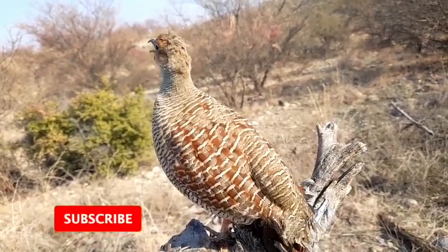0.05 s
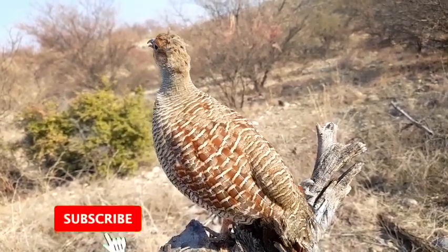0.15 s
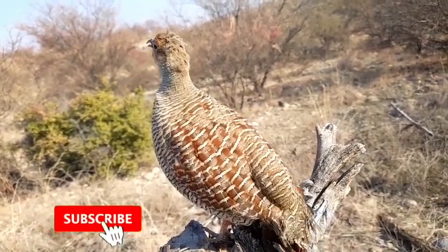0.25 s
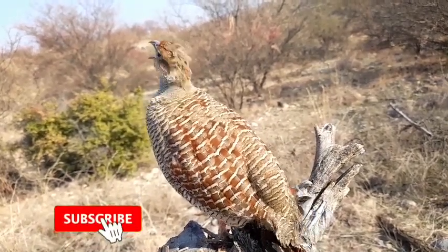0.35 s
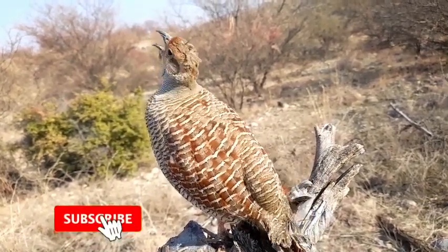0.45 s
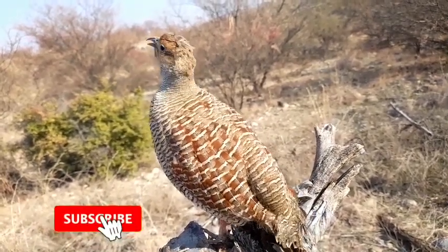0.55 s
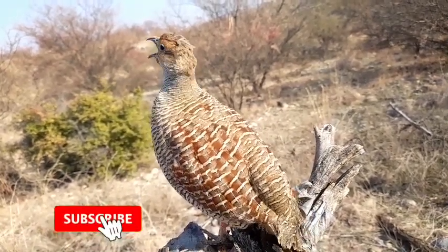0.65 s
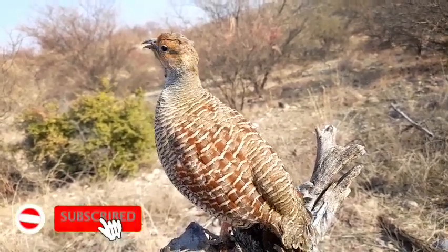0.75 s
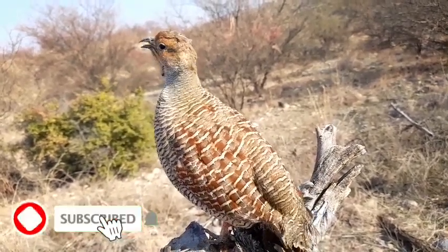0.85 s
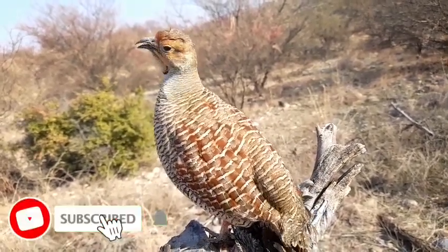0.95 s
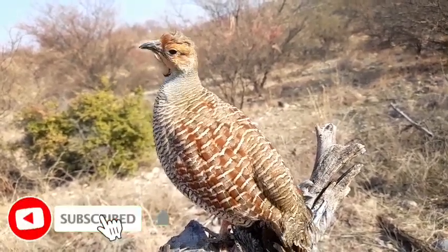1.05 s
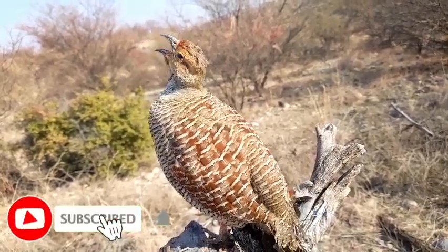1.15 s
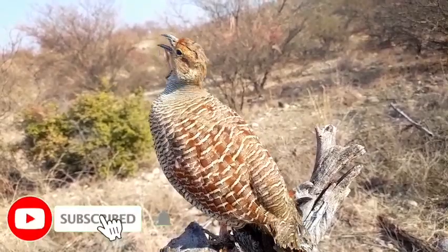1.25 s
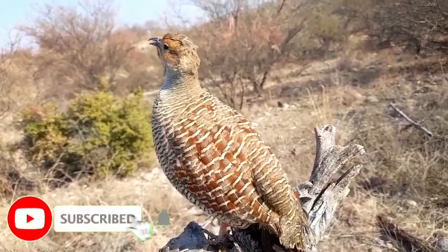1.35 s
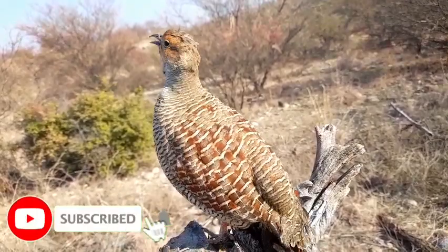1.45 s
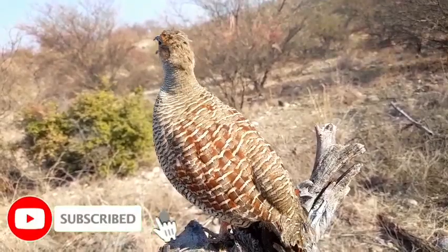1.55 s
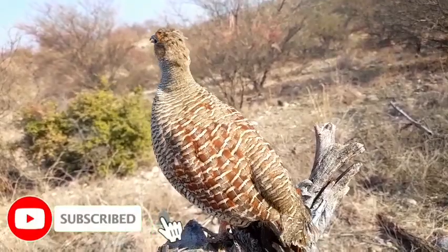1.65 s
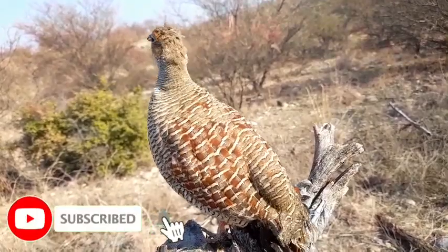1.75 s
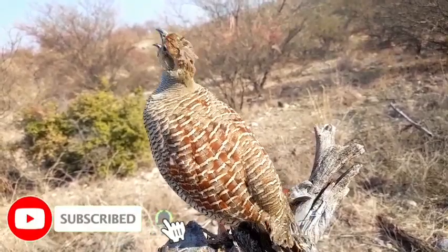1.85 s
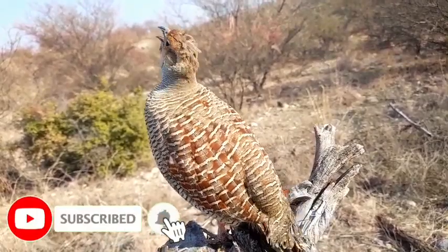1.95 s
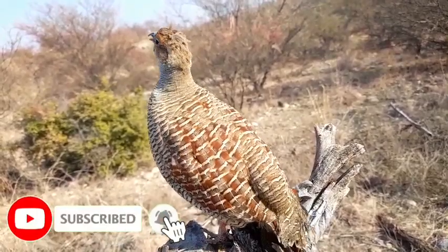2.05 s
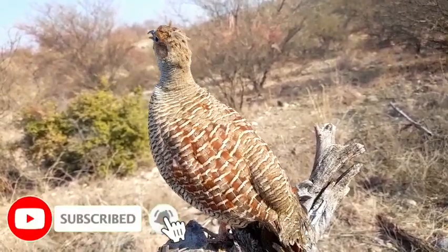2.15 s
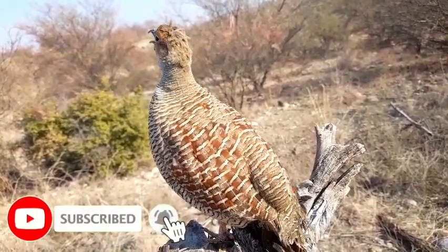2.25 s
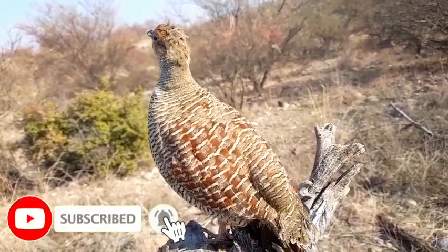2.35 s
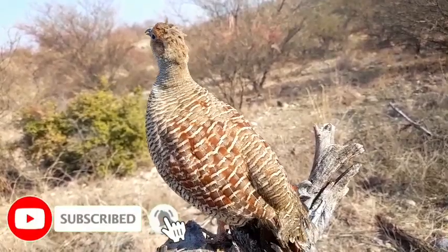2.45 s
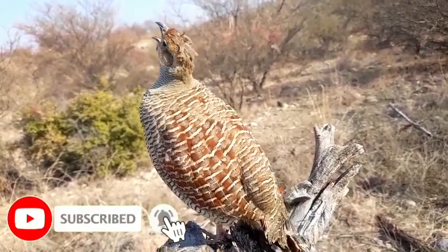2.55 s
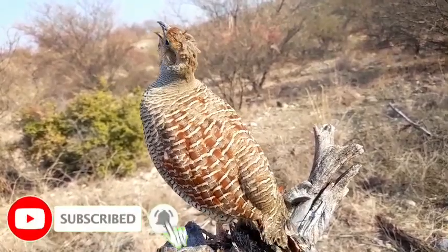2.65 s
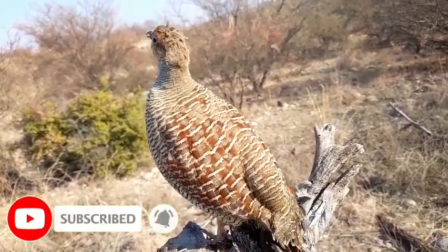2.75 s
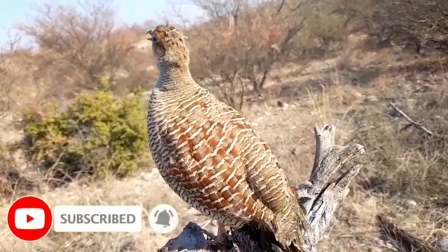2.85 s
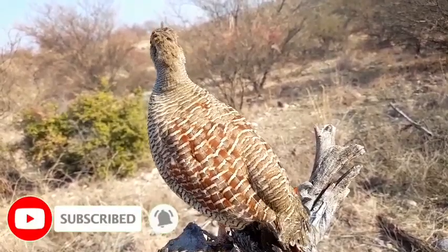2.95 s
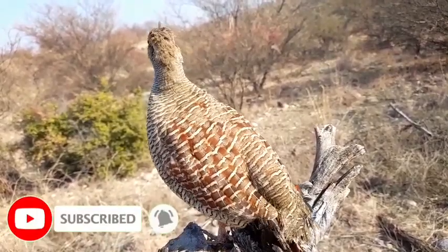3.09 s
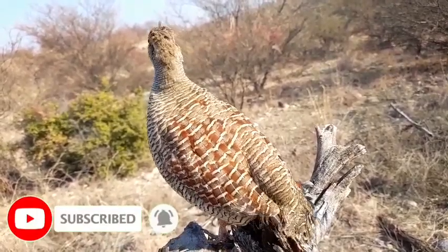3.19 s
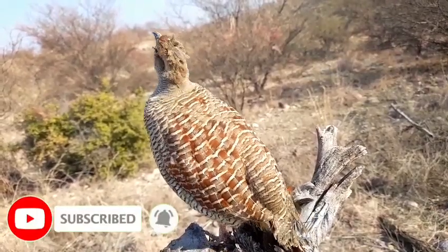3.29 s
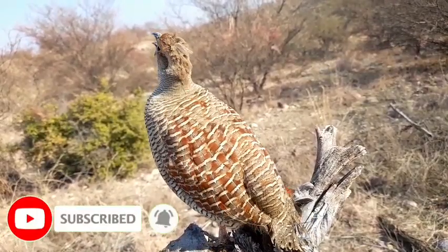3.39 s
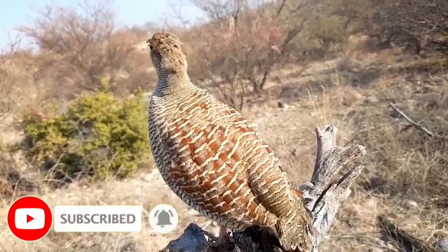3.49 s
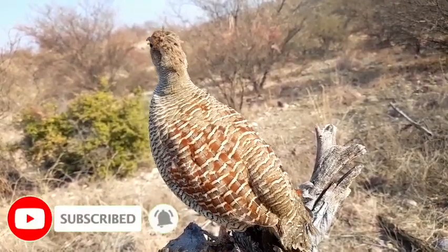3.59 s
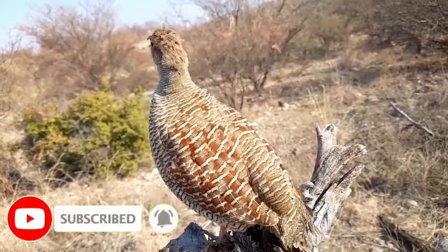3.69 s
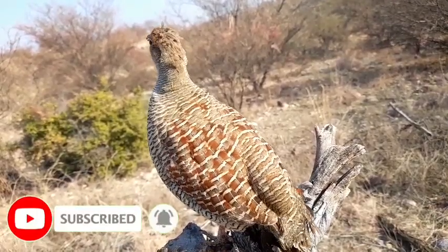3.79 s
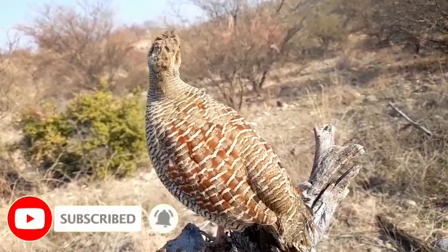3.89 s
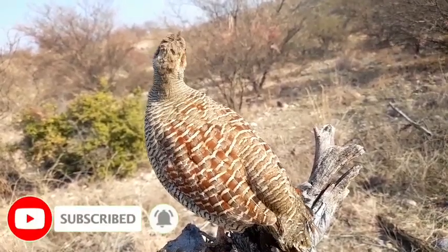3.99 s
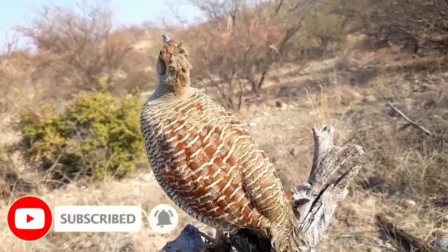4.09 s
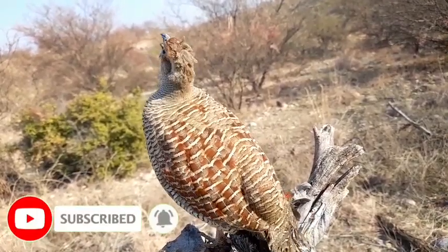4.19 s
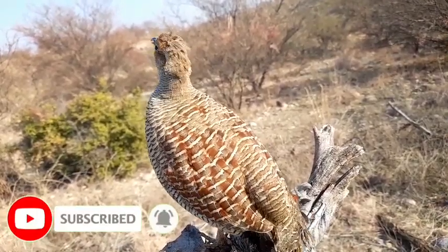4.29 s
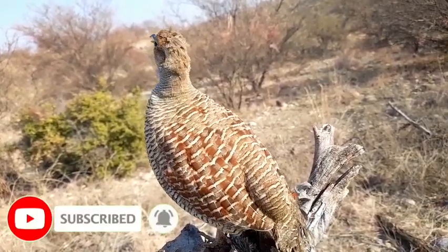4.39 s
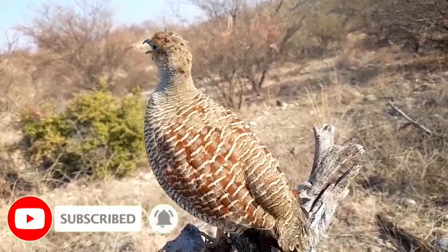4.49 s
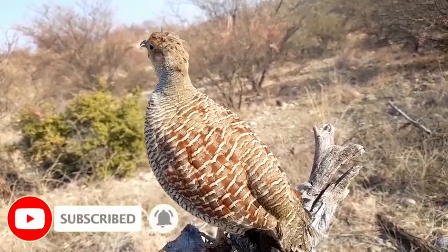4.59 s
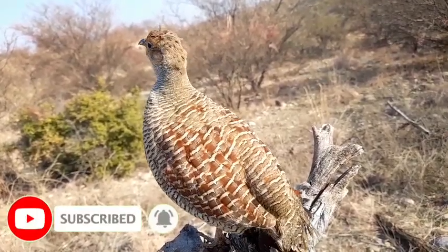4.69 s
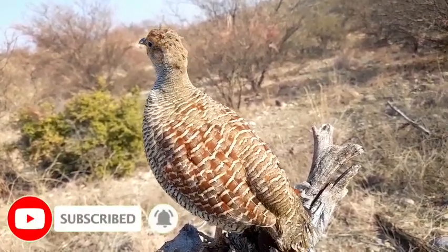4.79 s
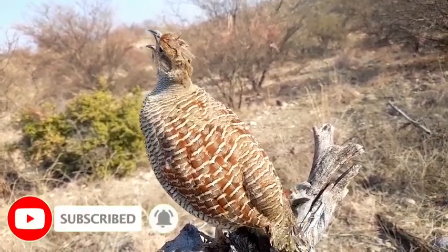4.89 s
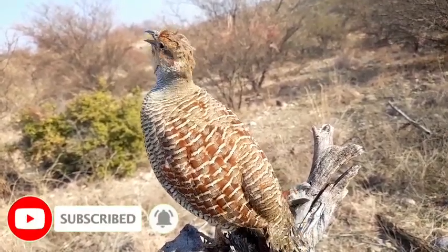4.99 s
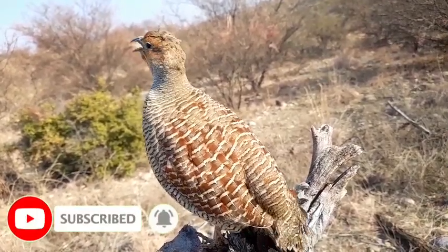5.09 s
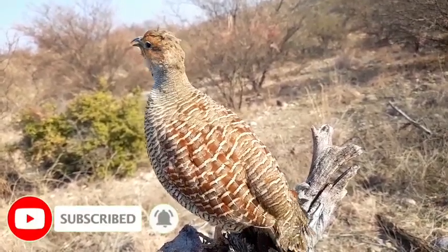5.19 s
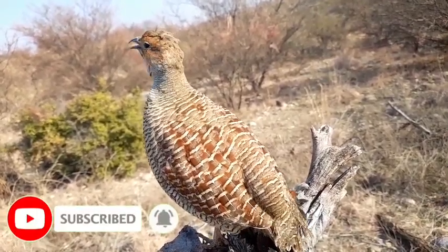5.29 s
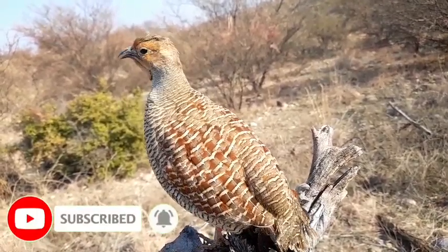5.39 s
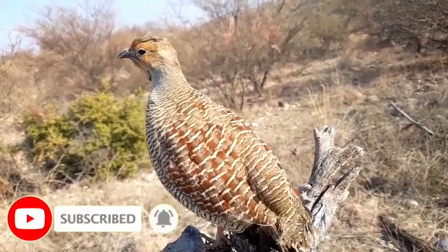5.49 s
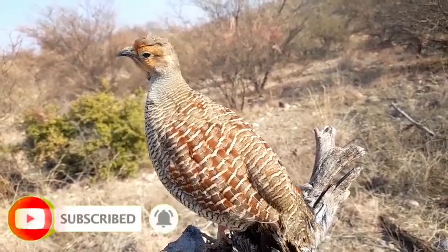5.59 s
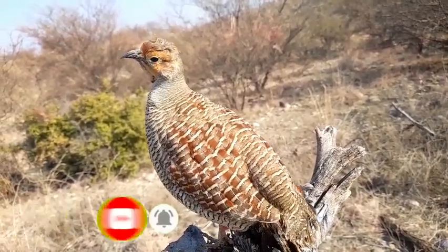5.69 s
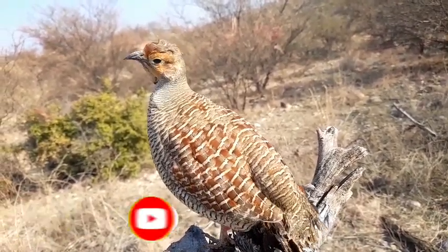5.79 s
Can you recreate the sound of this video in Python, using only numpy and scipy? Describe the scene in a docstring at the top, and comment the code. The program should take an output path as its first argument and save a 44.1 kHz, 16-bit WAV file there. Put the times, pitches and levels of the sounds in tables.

```python
"""A grey francolin calls in still scrub, close to a stereo pair; two clipped chips come first, then seven phrases.
Each phrase opens with a soft, nearly pure rising whistle, then one loud shriek that breaks between registers.
Chips follow, a buzz that flips into a falling tone and creaks shut; some phrases end in clucks of buzz alone.
A low flutter and a soft thump go with the shrieks; the ground and hillside return a faint wash over quiet air."""
import sys
import numpy as np
from scipy import signal
from scipy.fft import rfft, irfft
from scipy.io import wavfile
from scipy.ndimage import uniform_filter1d

SR = 44100
rng = np.random.default_rng(int(sys.argv[2]) if len(sys.argv) > 2 else 0)


def put_to_file(sound):
    """Save the sound as 16-bit audio at rate SR, in the file named by the first command-line argument."""
    columns = np.atleast_2d(sound).T  # one column per channel
    safe = np.clip(columns, -1, 1)
    whole_steps = np.round(safe * 32767)
    wavfile.write(sys.argv[1], SR, whole_steps.astype(np.int16))


N = 257544  # samples

# Shrieks: start_s, pitch_factor, level_db, rasp_share (how far a rasp takes over the ending, 0-1)
SHRIEKS = [(0.411, 1.042, -3, .9), (1.162, 1.0271, -2.5, 1), (1.854, 1.023, -3, .75),
           (2.568, 1.027, -3, .1), (3.293, 1.003, -3.5, .8), (4.101, 0.9988, -2, .05),
           (4.887, 1.0043, -3.5, .1)]
# Registers a shriek leaps through, timed from its start: start_s, length_s, pitch_multiple,
# slide_share (across the stretch), level_db, overtone_db, roughness (0-1); both levels before the effort fades
REGISTERS = [(.007, .023, 1.02, 0.02, -9.5, -3.5, .04), (0.027, .022, 1.37, 0.061, -16.5, 4, 0.5),
             (0.045, .022, 1.285, -.02, -9.5, -3.5, .17), (.064, .016, .98, -.08, -6.5, -9.5, .05),
             (0.091, .072, 1.005, -.02, -2.5, -10.5, .07)]
# Cracks into buzz within a shriek: start_s, length_s, first_rate_hz, last_rate_hz, level_db, tilt_db_per_octave
CRACKS = [(.001, .01, 1240, 1946, -14.5, 4.5), (.078, 0.018, 1435, 1237, -15.5, 3),
          (0.153, .017, 1450, 600, -26.5, -4.5)]
# Squeals where the tone is about to catch, before the shriek's pitch factor:
# start_s, length_s, first_pitch_hz, last_pitch_hz, level_db
SQUEALS = [(.025, 0.0076, 2647, 3150, -24.5), (0.038, 0.0097, 3043, 3400, -20.5),
           (0.063, 0.012, 3250, 2850, -26.5), (.089, .009, 2712, 3050, -27.5)]
# Chips: peak_s (moment of the pitch peak), length_factor, pitch_factor, tone_db (before a trim), buzz_db
CHIPS = [(0.014, 1.074, 1.019, -13, -23), (0.159, 0.867, 0.958, -17, -21.5),
         (0.74, 0.982, 1.017, -13, -21.5), (0.885, 0.8895, 0.9684, -15.5, -22),
         (1.487, 0.9656, 1.013, -13.5, -20.5), (1.627, 0.855, 0.96, -18.5, -21.5),
         (2.179, 0.963, 0.991, -14, -21.5), (2.319, 0.8595, 0.9476, -19.5, -22),
         (2.892, 0.92, 0.98, -16, -21.5), (3.61, 0.985, 0.984, -16.5, -21.5),
         (4.422, 0.912, 0.9727, -18.5, -20.5), (5.2, 0.921, 0.949, -18.5, -22)]
# Rising whistles: start_s, length_s, low_hz, high_hz, steepest_s (after the start), glide_s,
# level_db, swell_s, fade_db (drop by the end)
WHISTLES = [(0.282, 0.157, 1570, 2831, 0.0526, .035, -32, .045, -2),
            (1.035, .128, 2010, 2874, 0.056, .035, -31.5, 0.098, 12),
            (1.715, 0.16, 1555, 2855, 0.0999, .035, -24, 0.096, 16.5),
            (2.427, 0.158, 1512, 2834, 0.0841, .035, -24.5, 0.054, 21.5),
            (3.134, 0.15, 1534, 3166, 0.10726, 0.0373, -20.5, 0.11, 20),
            (3.861, 0.2348, 1347, 3264, 0.07025, 0.0517, -24, 0.071, 32),
            (4.729, 0.1807, 1422, 3070, 0.0563, 0.03624, -26.5, 0.0601, 11)]
# Faint harmonics of a whistle: multiple, level_db
WHISTLE_OVERTONES = [(2, -44), (3, -63.5)]
# Clucks: middle_s, length_s, top_rate_hz (pulses), level_db (before a trim)
CLUCKS = [(2.473, .05, 421, -42.5), (3.749, 0.064, 720.5, -24), (4.56, 0.064, 713.6, -25),
          (5.337, 0.062, 698.7, -24), (5.465, 0.038, 472.6, -38)]

# Spectra, each as pitch_hz, level_db (relative)
# What throat and beak pass of the buzz, before its tilt
BUZZ_COLOUR = [(250, -35.5), (700, -19.5), (950, -19.5), (1400, -4), (1700, -5.5), (2100, 1.5),
               (2500, -5.5), (2950, 1.5), (3500, -3.5), (4800, -6.5), (6000, -10.5), (8000, -24),
               (15000, -57)]
# What throat and beak pass of the overtones
BEAK = [(3000, 0), (7250, 0), (7900, -21), (9200, -28), (10300, -16), (11200, -14), (12800, -22),
        (14500, -14), (15800, -32)]
# What throat and beak pass of the hiss
HISS = [(200, -21), (900, -16), (1700, -20.5), (2500, -2.5), (3300, -0.5), (4200, 2.5), (5800, 6),
        (7200, -1.5), (8800, -18.5), (11200, -9.5), (13000, -10), (15000, -17.5)]
# The half-shut beak of a cluck
CLUCK_MOUTH = [(400, 0), (750, -4.5), (1400, -1), (2200, 3.5), (2700, 0.5), (3300, -6.5), (4100, -3.5),
               (6000, -1.5)]
# Faint hiss around a whistle
AIRY = [(100, -15.5), (400, -6.5), (1000, -8), (2500, 2), (6000, -3.5), (8500, -20)]
# Low flutter under a shriek
PUFF = [(20, 3.5), (55, 16.5), (120, 8), (200, -24), (350, -16), (600, -17), (1200, -42.5), (3000, -63.5)]
# Soft thump at a shriek
THUMP = [(30, -11), (130, -3), (330, -7.5), (550, -14.5), (1200, -38), (3000, -87)]
# Colour of the echo off the scrub
SCRUB = [(200, -35), (1200, 3), (2300, 5), (3000, 6), (4200, 4), (5600, 6.5), (8000, -3.5), (15000, -15.5)]
# Still air
AIR = [(18, -44), (30, -25), (71, -3.5), (102, -17.5), (216, -10), (312, -15), (597, -25.5), (15000, -29)]

# Open beak at the two microphones: pitch_hz, left_minus_right_db
BALANCE = [(300, 0), (1300, -3), (1950, -1), (2250, 7), (2480, 2), (2750, -3), (3400, 0), (3900, -3),
           (4900, -9), (6200, -8), (7300, 3), (8400, 3), (11000, -3), (13000, -2), (14600, 8)]
# Longer path to the right microphone, lead steepest near 2.2 kHz: pitch_hz, left_lead_rad
LEAD = [(100, 0), (1100, 1.1), (1900, 3), (2060, 4.2), (2300, 7.3), (2550, 7.8), (3100, 9.4), (4500, 11.2),
        (6000, 13.9), (7200, 16.1), (8600, 15.8), (10000, 18.4), (12500, 21.8), (14500, 25.4)]

EDGE_HZ = 15600  # top of the recorded band
# The shriek's base pitch holds, then sags by this share as the effort fades
SHRIEK_HZ, SAG_FROM_S, SAG_TO_S, SAG = 2752.4, .051, .16, .24
# Meanwhile the tone softens and loses its overtones
SPENT_FROM_S, SPENT_DB_PER_S, DULLING_DB_PER_S = .09043, 167.5, 247.5
# Each register takes this long to catch and let go, and is rougher meanwhile
FLIP_S, FLIP_ROUGH = .007, .3
# Its pitch scoops in and drops out by this share
SCOOP_S, SCOOP = .009, .065
# The other side of the syrinx, late in a shriek; base pitch and full-rasp level
RASP_FROM_S, RASP_S, RASP_HZ, RASP_DB = .107, .043, 3181, -20.5
# Chip times below are before the chip's length factor, pitches before its pitch factor.
# The tone peaks here and falls toward this share lower on both sides
CHIP_HZ, CHIP_DROP, CHIP_BEND_S = 2593.6, .4, .017
# The tone's level: up to the pitch peak, held, released
CHIP_RISE_S, CHIP_HOLD_S, CHIP_FALL_S = .015, .017, .025
# The buzz that climbs into the tone
LEAD_IN_S, LEAD_IN_PAST_S, LEAD_IN_FIRST_HZ, LEAD_IN_LAST_HZ = .03939, .0015, 339.3, 881.8
# The buzz that closes the chip: its rates take no pitch factor, its level is relative to the chip's buzz
CREAK_AT_S, CREAK_S, CREAK_FIRST_HZ, CREAK_LAST_HZ, CREAK_DB = .019, .022, 734, 277.8, -11.5


def shrieks(yield_db=17, rasp_arch=.14, yield_focus=3):
    """The tone leaps between registers, cracking and squealing at the breaks, and yields to a late rasp."""
    out = np.zeros(N)
    for s, pitch, gain_db, rasp in SHRIEKS:
        voice = np.zeros(SR // 4)
        for start, length, multiple, *timbre in REGISTERS:
            add(voice, start, register(start, length, pitch * multiple, *timbre))
        for start, length, *shape in CRACKS:
            add(voice, start, creak(length, *shape))
        for start, length, first_hz, last_hz, db in SQUEALS:
            t = np.arange(0, length, 1 / SR)
            hz = pitch * np.linspace(first_hz, last_hz, len(t))
            add(voice, start, arch(t) * tone(t, hz, db, overtone_db=7.5, half_db=-20, rough=1.0))

        # the tone gives way where the rasp enters
        t = np.arange(0, RASP_S, 1 / SR)
        rival = np.zeros(len(voice))
        add(rival, RASP_FROM_S, rasp * arch(t, yield_focus))
        voice *= amp(-yield_db * rival)

        hz = RASP_HZ * pitch * (1 - rasp_arch * (1 - arch(t)))
        rasping = tone(t, hz, RASP_DB, overtone_db=2.5, half_db=-23.5, rough=.65)
        add(voice, RASP_FROM_S, abs(rasp) ** .5 * arch(t) * rasping)
        add(out, s, amp(gain_db) * voice)
    return out


def register(start, length, pitch, slide, db, overtone_db, rough):
    """One stretch of a shriek's tone, riding on the pitch and effort of the whole shriek."""
    t = np.arange(0, length, 1 / SR)
    caught = ramp(t, FLIP_S) * ramp(length - t, FLIP_S)
    sag = SAG * np.maximum((start + t - SAG_FROM_S) / (SAG_TO_S - SAG_FROM_S), 0) ** 3
    spent = np.maximum(start + t - SPENT_FROM_S, 0)
    settled = ramp(t, SCOOP_S) * ramp(length - t, SCOOP_S)
    bend = slide * (t / length - .5) - SCOOP * (1 - settled)
    hz = SHRIEK_HZ * pitch * (1 - sag + bend + .001 * wobble(t, 66))
    return caught * tone(t, hz, db - SPENT_DB_PER_S * spent, overtone_db - DULLING_DB_PER_S * spent,
                         half_db=-45, rough=rough + FLIP_ROUGH * (1 - caught))


def chips(tilt_db=1.0, creak_tilt_db=-5.0, tone_trim_db=-1, swell_s=.025, yield_s=.0067):
    """A rising buzz flips into a tone that peaks and falls, and closes with a creak."""
    out = np.zeros(N)
    for s, stretch, pitch, tone_db, buzz_db in CHIPS:
        t = np.arange(0, LEAD_IN_S + LEAD_IN_PAST_S, 1 / (SR * stretch))
        rate = pitch * np.linspace(LEAD_IN_FIRST_HZ, LEAD_IN_LAST_HZ, len(t))
        lead_in = buzz(t, rate, buzz_db, tilt_db) * ramp(t, swell_s) * ramp(t[-1] - t, yield_s)
        add(out, s - LEAD_IN_S * stretch, lead_in)
        add(out, s - CHIP_RISE_S * stretch, chip_tone(stretch, pitch, tone_db + tone_trim_db))
        closing = creak(CREAK_S * stretch, CREAK_FIRST_HZ, CREAK_LAST_HZ, buzz_db + CREAK_DB,
                        creak_tilt_db, fullness=2.4)
        add(out, s + CREAK_AT_S * stretch, closing)
    return out


def chip_tone(stretch, pitch, db, overtone_db=-7, dulling_db_per_s=1200, rough=.06, rough_start=1.0,
              catch_power=2.1):
    """A peak of pitch that starts rough and shrill, and clears as it falls."""
    t = np.arange(-CHIP_RISE_S, CHIP_HOLD_S + CHIP_FALL_S, 1 / (SR * stretch))
    hz = CHIP_HZ * pitch * (1 - CHIP_DROP * t ** 2 / (t ** 2 + CHIP_BEND_S ** 2))
    caught = ramp(t + CHIP_RISE_S, CHIP_RISE_S) ** catch_power
    voice = tone(t, hz, db, overtone_db - dulling_db_per_s * t, half_db=-44.5,
                 rough=rough + rough_start * (1 - caught))
    return caught * ramp(t[-1] - t, CHIP_FALL_S) * voice


def whistles(waver=.0013, airy_db=-42, flicker_db=1.76):
    """Nearly pure S-shaped upward glides that swell in and fade, sung with the beak shut."""
    out = np.zeros(N)
    for s, length, low_hz, high_hz, steepest, glide, db, swell, fade_db in WHISTLES:
        t = np.arange(0, length, 1 / SR)
        hz = low_hz + (high_hz - low_hz) / (1 + np.exp((steepest - t) / glide))
        phase = 2 * np.pi * np.cumsum(hz * (1 + waver * wobble(t, 150))) / SR
        lines = np.sin(phase) + sum(amp(d) * np.sin(round(k) * phase) for k, d in WHISTLE_OVERTONES)
        airy = amp(airy_db) * unit(colour(rng.standard_normal(len(t)), AIRY))
        level = amp(db - fade_db * (t / length) ** 3 + flicker_db * wobble(t, 40))
        level = level * ramp(t, swell) * ramp(length - t, .004)
        add(out, s, np.sqrt(2) * level * (lines + airy))
    return out


def clucks(tilt_db=-3, dulling=.33, trim_db=1, edge_db=27, edge_hz=280, airy_db=-10):
    """Too weak to reach the tone: the buzz just arches up and down, duller the softer it is."""
    out = np.zeros(N)
    loudest_db = max(row[-1] for row in CLUCKS)
    for s, length, hz, db in CLUCKS:
        t = np.arange(-length / 2, length / 2, 1 / SR)
        edge = (2 * t / length) ** 2  # 0 in the middle, 1 at both ends
        rate = hz - (hz - edge_hz) * edge
        tilt = tilt_db + dulling * (db - loudest_db)
        cluck = buzz(t, rate, db + trim_db - edge_db * edge ** 1.8, tilt, hiss_db=airy_db)
        add(out, s + t[0], colour(cluck, CLUCK_MOUTH) * signal.windows.tukey(len(t), .2))
    return out


def creak(length, first_hz, last_hz, level_db, tilt_db, fullness=.45):
    """A short swell of buzz whose rate glides; a higher fullness exponent narrows the swell."""
    t = np.arange(0, length, 1 / SR)
    return arch(t, fullness) * buzz(t, np.linspace(first_hz, last_hz, len(t)), level_db, tilt_db)


def tone(t, hz, level_db, overtone_db, half_db, rough, jitter_hz=700, jitter=.055, shimmer=.067,
         hiss_db=-9, rolloff_db=3, rattle=.43, rattle_hz=480):
    """A membrane of the syrinx: lines with overtones and half-multiples that smear and rattle as it roughens."""
    phase = 2 * np.pi * np.cumsum(hz * (1 + jitter * rough * wobble(t, jitter_hz))) / SR
    beat = np.sin(2 * np.pi * np.cumsum(rattle_hz * (1 + .34 * wobble(t, 200))) / SR)
    phase = phase + rattle * rough * beat  # the low register shakes the tone: sidebands

    over = np.zeros(len(t))
    for k in range(2, 6):
        passed = amp(read(BEAK, k * hz) - rolloff_db * (k - 2.5)) * (k * hz < EDGE_HZ)
        over += passed * np.sin(k * phase)
    # lines at half-multiples of the pitch: the doubled period
    halves = sum(np.sin((k + .5) * phase) / np.sqrt(k + 1) for k in range(3))
    lines = np.sqrt(2) * (np.sin(phase) + amp(overtone_db) * over + amp(half_db) * halves)

    hiss = unit(colour(rng.standard_normal(len(t)), HISS))
    hiss = amp(hiss_db + overtone_db / 2) * np.sqrt(abs(rough)) * hiss
    unsteady = 1 + rough * (shimmer * wobble(t, jitter_hz) + rattle * beat / 2)
    return amp(level_db) * (lines * unsteady + hiss)


def buzz(t, hz, level_db, tilt_db, jitter=.028, jitter_hz=350, hiss_db=-6, odd_db=-3, shimmer=.3):
    """The low register: uneven strong-weak cycles and puffs of air through the throat, tilted in dB an octave."""
    phase = 2 * np.pi * np.cumsum(hz * (1 + jitter * wobble(t, jitter_hz))) / SR
    lags = rng.uniform(0, 2 * np.pi, 24)  # the ringing windpipe spreads each pulse over its cycle
    cycles = np.zeros(len(t))
    for k, lag in enumerate(lags, 1):
        cycles += (k * hz < EDGE_HZ) * amp(odd_db * (k % 2)) * np.cos(k * phase + lag)
    puffs = (1 + np.cos(phase)) * np.gradient(rng.standard_normal(len(t)))  # airier toward the treble
    drive = unit(cycles) * (1 + shimmer * wobble(t, jitter_hz)) + amp(hiss_db) * unit(puffs)
    throat = [(f, db + tilt_db * np.log2(f)) for f, db in BUZZ_COLOUR]
    low_cut = signal.butter(4, 280, "high", fs=SR, output="sos")
    return amp(level_db) * unit(signal.sosfilt(low_cut, colour(drive, throat)))


def flutter(voice, level_db=-42, growth=1.9, own=1.2, thump_db=-35, thump_at=.038, thump_s=.019):
    """A low flutter that swells with the shrill part of the voice, and a soft thump early in each shriek."""
    shrill = signal.sosfilt(signal.butter(4, 5000, "high", fs=SR, output="sos"), voice)
    swell = np.sqrt(abs(uniform_filter1d(shrill ** 2, size=1200)))
    # one noise shared by both microphones, plus one of each microphone's own
    noise = rng.standard_normal(N) + own * rng.standard_normal((2, N))
    u = np.arange(SR // 5) / SR / thump_s
    blows = np.zeros(N)
    for s, *_ in SHRIEKS:
        add(blows, s + thump_at, np.exp(-u) * (1 - np.exp(-10 * u)))
    thumps = amp(thump_db) * blows * unit(colour(noise, THUMP))
    return amp(level_db) * (swell / swell.max()) ** growth * unit(colour(noise, PUFF)) + thumps


def place(x, balance_db, lead):
    """Two microphones: the left one hears the bird first, the right one lags by a phase in radians."""
    gains = np.array([amp(balance_db / 2), amp(-balance_db / 2)]).reshape(2, -1)
    gains = gains / np.sqrt((gains ** 2).mean(0))
    turn = np.array([np.ones_like(lead), np.exp(-1j * lead)]).reshape(2, -1)
    return irfft(rfft(x, 2 * N) * gains * turn)[:, :N]


def hillside(x, far_db=-42, t60=.55, near_db=-25, near_t60=.079):
    """Scatter from the ground nearby, then a thin wash from bushes and slope: sparse decaying random taps."""
    t = np.arange(SR) / SR
    taps = rng.standard_normal((2, SR)) * (rng.random((2, SR)) < .08) * (t > .003)
    near = taps * amp(-60 * t / near_t60)
    far = taps * amp(-60 * t / t60)
    echo = amp(near_db) * near / np.linalg.norm(near[0]) + amp(far_db) * far / np.linalg.norm(far[0])
    return signal.fftconvolve(colour(np.pad(x, (0, SR)), SCRUB)[None], echo, axes=1)[:, :N]


def still_air(level_db=-85.5):
    """Very faint, steady noise, strongest in the bass and independent at each microphone."""
    return amp(level_db) * unit(colour(rng.standard_normal((2, N)), AIR))


def amp(db):
    """Decibels to gain."""
    return 10 ** (np.asarray(db) / 20)


def unit(x):
    """Scales to rms 1."""
    return x / np.sqrt(np.mean(x ** 2) + 1e-20)


def read(points, hz):
    """Reads a spectrum on a log-frequency axis."""
    f, value = np.transpose(points)
    return np.interp(np.log(hz + 1), np.log(f + 1), value)


def colour(x, points):
    """Filters by a spectrum in dB."""
    hz = np.fft.rfftfreq(x.shape[-1], 1 / SR)
    return irfft(rfft(x) * amp(read(points, hz)), x.shape[-1])


def wobble(t, hz):
    """Random motion of rms 1, up to about hz."""
    f = np.fft.rfftfreq(len(t), 1 / SR)
    return unit(irfft(rfft(rng.standard_normal(len(t))) / (1 + (f / hz) ** 2), len(t)))


def ramp(t, seconds):
    """A smooth step from 0 at t = 0 to 1 after so many seconds."""
    return np.sin(np.pi / 2 * np.clip(t / seconds, 0, 1)) ** 2


def arch(t, power=1):
    """Rises from near 0 to 1 and returns over the span of t."""
    return np.sin(np.linspace(0, np.pi, len(t) + 2)[1:-1]) ** power


def add(mix, s, sound):
    """Mixes a sound in at time s, cutting what falls outside."""
    at = round(s * SR)
    sound = sound[max(-at, 0):]
    part = mix[max(at, 0):][:len(sound)]
    part += sound[:len(part)]


def scene():
    """The bird at the two microphones, its flutter, its echo and the still air."""
    soft = whistles()
    loud = shrieks() + chips() + clucks()
    hz = np.fft.rfftfreq(2 * N, 1 / SR)
    shut_beak = place(soft, balance_db=-7.0, lead=.17)
    open_beak = place(loud, read(BALANCE, hz), read(LEAD, hz))
    return shut_beak + open_beak + flutter(loud) + hillside(soft + loud) + still_air()


def record(dry):
    """The loudest peaks are rounded off; then the recorder's band limit."""
    rounded = dry / (1 + (dry / .92) ** 8) ** (1 / 8)
    band = signal.firwin(401, EDGE_HZ, window=("kaiser", 9), fs=SR)
    return signal.oaconvolve(rounded, band[None], "same")


dry = scene()
out = record(dry)
put_to_file(out)
```